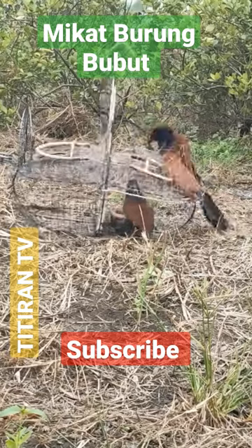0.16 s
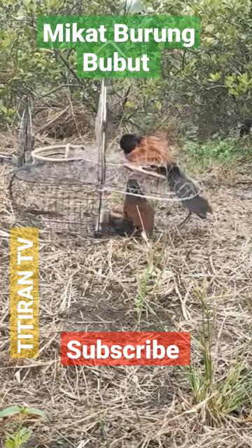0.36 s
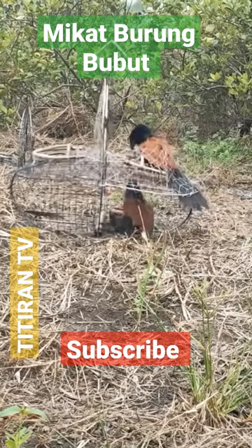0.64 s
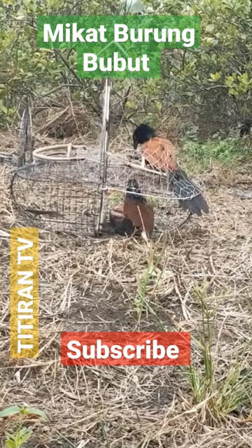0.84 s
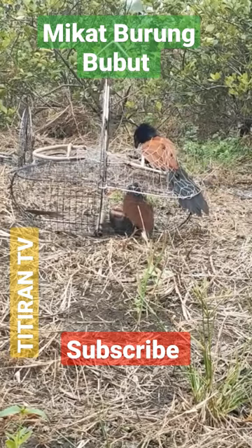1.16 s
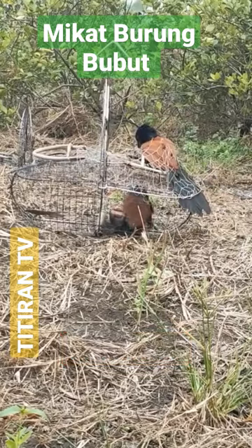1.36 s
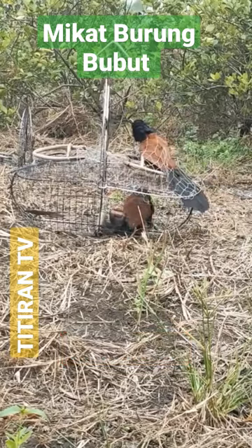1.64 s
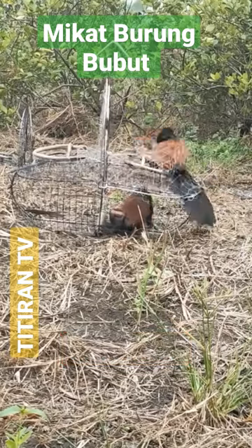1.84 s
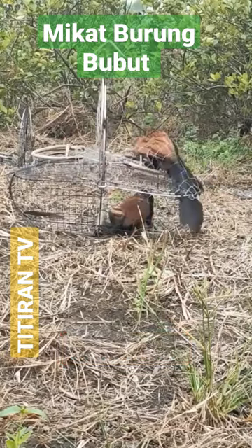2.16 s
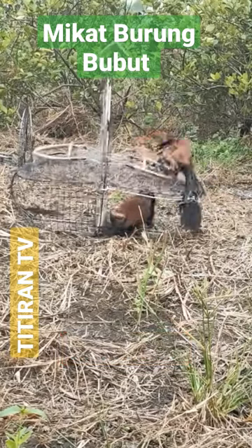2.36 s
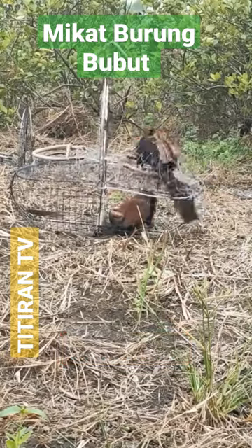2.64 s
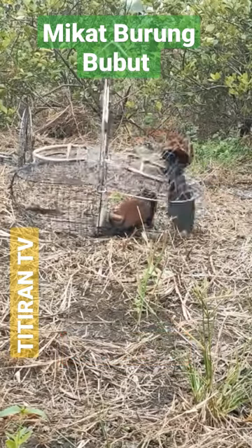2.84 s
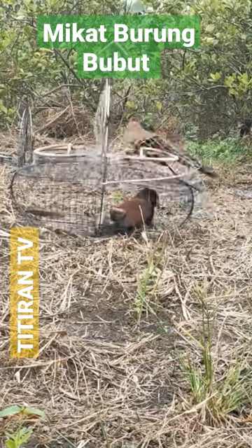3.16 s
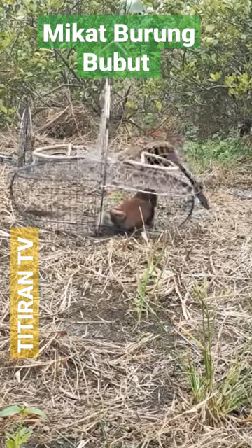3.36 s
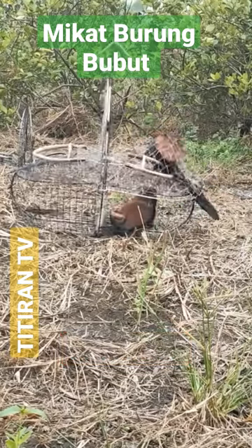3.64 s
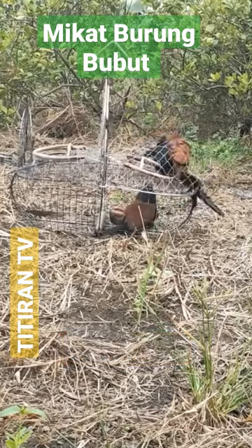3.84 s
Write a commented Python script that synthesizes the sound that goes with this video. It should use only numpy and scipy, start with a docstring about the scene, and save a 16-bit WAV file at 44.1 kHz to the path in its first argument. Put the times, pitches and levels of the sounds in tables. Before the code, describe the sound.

A coucal's low, nearly pure hoots start softly at 2.4 seconds, grow quickly and repeat about every 0.23 seconds to the end. Before them, claws and feathers scratch, thud and rattle on a wire cage until 0.55 and around 0.9-1.4, returning lightly after 3.3. High insect trills buzz in four bursts over faint shimmer, distant hoots, late thin whistles and quiet open air.

```python
"""Coucal and caged bird in a dry clearing

A coucal close by gives a run of low, nearly pure hoots, built from swept sines with raspy overtones.
A bird flaps and scrabbles on a wire cage: noise bursts, brushed feathers and faintly ringing wires.
Behind them insects buzz in two bands, far coucals hoot on a steady beat and a far bird whistles thinly.
Scatter from the surrounding scrub, two short echoes of the hoots and a quiet hush of air fill the place."""
import sys
import numpy as np
from scipy import signal
from scipy.fft import rfft, irfft
from scipy.io import wavfile
from scipy.ndimage import uniform_filter1d

SR = 44100
rng = np.random.default_rng(int(sys.argv[2]) if len(sys.argv) > 2 else 0)


def file_out(sig):
    """Save sig as 16-bit WAV at sys.argv[1]."""
    # one column per channel
    cols = np.atleast_2d(sig).T
    # limit, then scale
    lim = np.clip(cols, -1, 1)
    pcm = np.round(lim * 32767).astype(np.int16)
    wavfile.write(sys.argv[1], SR, pcm)


N = 176400
TOP_HZ = 15600  # upper edge of the recorder's treble


def undb(db):
    """Decibels to gain."""
    return 10 ** (np.asarray(db) / 20)


def unit(x):
    """Scale to an rms of 1."""
    return x / np.sqrt(np.mean(x ** 2) + 1e-20)


def fade(u):
    """Smooth step from 0 to 1."""
    return np.sin(np.pi / 2 * np.clip(u, 0, 1)) ** 2


def walk(rate):
    """Smooth random wander with an rms near 1, from `rate` random values a second smoothed twice."""
    k = max(int(SR / rate), 1)
    steps = np.repeat(rng.standard_normal(N // k + 1), k)
    smooth = uniform_filter1d(uniform_filter1d(steps, k), k)
    return unit(smooth[:N])


def stereo_noise(side_db):
    """White noise with a shared middle and a side part at side_db relative to it."""
    mid, side = rng.standard_normal((2, N))
    return mid + undb(side_db) * side * np.array([[1], [-1]])


def filtered(x, points):
    """Causal (minimum-phase) filter through (Hz, dB) points that keeps the power of white noise."""
    hz, db = np.array(points, float).T
    size = 2 * N
    f = np.maximum(np.arange(N + 1) * SR / size, 1)
    gain = unit(undb(np.interp(np.log(f), np.log(hz), db)))
    cepstrum = irfft(np.log(gain))
    # fold the cepstrum onto positive time, so nothing sounds ahead of its cause
    cepstrum[1:N] *= 2
    cepstrum[N + 1:] = 0
    response = np.exp(rfft(cepstrum))
    return irfft(rfft(x, size) * response)[..., :N]


def colour(x, points):
    """Filtered sound at an rms of 1."""
    return unit(filtered(x, points))


def scrub(x, side_db):
    """Diffuse scatter from bushes and ground: a decaying stereo noise tail of unit energy."""
    t60_s, onset_s = 0.32, 0.016
    t = np.arange(N) / SR
    tail = stereo_noise(side_db) * np.exp(-np.log(1000) * t / t60_s) * fade(t / onset_s)
    return signal.fftconvolve(x[None], unit(tail) / np.sqrt(N), axes=1)[:, :N]


def air():
    """Quiet outdoor hush, its low part shared by both ears, with a faint insect haze on top."""
    # colour of the hush: f/Hz, relative level/dB
    hush_colour = [(100, -36.5), (160, -1.5), (230, 11.5), (350, 4.5), (480, 1.5), (800, -12.5), (1400, -8),
                   (2200, -8), (5800, -11.5), (7400, 3), (8900, -11.5), (10000, 1.5), (11500, -10),
                   (15500, -18)]
    level_db = -62.5
    mid = colour(rng.standard_normal(N), hush_colour)
    high_pass = signal.butter(1, 900, "high", fs=SR, output="sos")
    side = signal.sosfilt(high_pass, colour(rng.standard_normal(N), hush_colour))
    hush = mid + undb(-0.5) * side * np.array([[1], [-1]])
    return undb(level_db + .5 * walk(1.1)) * hush


def far_insects(t):
    """Many far insects merge into one shimmering band of noise."""
    # slow course of the chorus: t/s, level/dB
    chorus_level = [(0, -58), (.45, -52.5), (.7, -55.5), (1.1, -53), (1.6, -56), (2.02, -58.5), (2.2, -52),
                    (2.5, -52), (3.0, -57.5), (3.5, -53), (4, -55.5)]
    # colour of the chorus: f/Hz, relative level/dB
    chorus_colour = [(3500, -44), (4200, -21.5), (4500, -7.5), (4730, 0.5), (5250, -14), (6000, -45)]
    times, levels_db = np.array(chorus_level).T
    db = np.interp(t, times, levels_db) + .5 * walk(45)
    return undb(db) * colour(stereo_noise(side_db=-5.5), chorus_colour)


def far_coucals(t):
    """Faint, slightly falling hoots from two birds taking turns on one steady beat."""
    # one line a bird, repeated on the beat throughout: t/s of one hoot, mid-hoot f/Hz, level/dB
    far_hoots = [(0.336, 350, -60.5), (0.537, 326, -67.5)]
    beat_s, length_s, sag_hz_per_s = .383, 0.15, 120
    out = np.zeros(N)
    for first, hz, db in far_hoots:
        age = (t - first) % beat_s
        pitch = hz - sag_hz_per_s * (age - length_s / 2)
        arch = np.sin(np.pi * np.minimum(age / length_s, 1))
        out += undb(db) * arch * np.sin(2 * np.pi * np.cumsum(pitch) / SR)
    return out


def far_bird(t):
    """Thin, slightly hoarse whistles: gliding sines with wandering pitch and level, blurred by distance."""
    # start t/s, length/s, first f/Hz, middle f/Hz, last f/Hz, level/dB
    whistles = [(2.168, 0.16, 1495, 1540, 1423, -62), (2.385, 0.33, 1461, 1469, 1492, -62.5),
                (2.769, 0.14, 1598, 1569, 1594, -58), (3.0, 0.08, 1655, 1765, 1850, -50.5),
                (3.068, 0.06, 1943, 1886, 1790, -56.5), (3.089, 0.4, 1315, 1320, 1270, -67),
                (3.207, 0.43, 1760, 1702, 1693, -56), (3.541, 0.27, 1683, 1652, 1728, -67),
                (3.822, 0.15, 1616, 1687, 1760, -53.5)]
    hoarse_db, wet_db = -9, -1
    out, waver = np.zeros(N), 1 + 0.02 * walk(260)
    for start, length, first, middle, last, db in whistles:
        u = (t - start) / length
        pitch = np.interp(u, [0, .5, 1], [first, middle, last]) * waver
        phase = 2 * np.pi * np.cumsum(pitch) / SR
        tone = np.sin(phase) * (1 + 0.29 * walk(90))
        hoarse = undb(hoarse_db) * walk(970) * np.cos(phase)
        out += undb(db) * fade(u * 6) * fade((1 - u) * 2) * (tone + hoarse)
    return out + undb(wet_db) * scrub(out, side_db=0.5)


def near_insect(t):
    """Each wing stroke clicks and rasps in a narrow resonance; a trill grows, slows a little, stops short."""
    # start t/s, end t/s, level/dB it grows towards, first pulse rate f/Hz, last pulse rate f/Hz
    trills = [(-.25, 0.507, -52.5, 177, 163.8), (0.954, 1.704, -52, 176.6, 160.3),
              (2.148, 2.936, -51.5, 180, 162.3), (3.405, 4.169, -49.5, 177.5, 162.1)]
    # the resonance: f/Hz, relative level/dB
    trill_colour = [(4500, -42.5), (5700, -21.5), (6100, -15.5), (6330, -1.5), (6560, -1.5), (6850, -15),
                    (8000, -22.5), (9000, -37), (15500, -41)]
    rise_s, rise_db, stop_s = 0.22, 21, .008
    rasp_share, rasp_db, jitter = 0.45, -4.5, .006  # rasp_share: part of each stroke that rasps
    level, clicks, rasp_gate = np.zeros((3, N))
    unsteady = 1 + jitter * walk(170)
    for start, end, db, first_hz, last_hz in trills:
        on = (t > start) & (t < end)
        rate = np.interp(t, [start, end], [first_hz, last_hz]) * unsteady
        phase = np.cumsum(rate) / SR % 1
        clicks += on * (np.diff(phase, prepend=0) < 0)
        rasp_gate += on * (phase < rasp_share)
        growth_db = db - rise_db * np.exp(-np.maximum(t - start, 0) / rise_s)
        level += on * undb(growth_db) * fade((end - t) / stop_s)
    uneven_clicks = unit(clicks * undb(1.3 * walk(150)))
    rasp = unit(stereo_noise(side_db=7.0) * rasp_gate)
    buzz = level * colour(uneven_clicks + undb(rasp_db) * rasp, trill_colour)
    return buzz + undb(-0.5) * scrub(buzz.mean(axis=0), side_db=-2.5)


def crackle():
    """Dense tiny snaps of straw and feather barbs, each with its own pitch, size and side."""
    snaps_per_s, decay_cycles, spread_db = 600, 9, 3.5
    out, age = np.zeros((2, N + 512)), np.arange(512) / SR
    for when, pitch, size, side in rng.random((int(snaps_per_s * N / SR), 4)):
        hz = min(np.interp(pitch, [0, 1], [1400, 14500]), TOP_HZ)
        # higher snaps are shorter and stronger
        snap = np.sin(2 * np.pi * hz * age) * np.exp(-age * hz / decay_cycles) * hz
        ears = np.array([[np.sin(side * np.pi / 2)], [np.cos(side * np.pi / 2)]])
        strength = undb(-spread_db * np.log(max(size, .04)))  # few large, many small
        i = int(when * N)
        out[:, i:i + len(age)] += ears * snap * strength
    return unit(out[:, :N])


def flutter(x):
    """Barbs catch and let go: every narrow band swells and sinks on its own."""
    rate_per_s, depth_db, top_band = 55, 3.2, 20
    spectrum = rfft(x)
    f = np.arange(N // 2 + 1) * SR / N
    place = np.sqrt(f / TOP_HZ) * top_band  # bands widen towards the treble
    out = 0
    for band in range(top_band + 1):
        part = irfft(spectrum * np.maximum(1 - abs(place - band), 0), N)
        out = out + part * undb(depth_db * walk(rate_per_s))
    return unit(out)


def strikes_on_cage(t):
    """Claws and wings hit the mesh: bright scratch, wire clatter, thud and a squeak at its own pitch."""
    # t/s, decay/s, then relative levels: scratch/dB, clatter/dB, thud/dB, and squeak f/Hz
    strikes = [(.004, 0.003, -41.5, -59, -26.5, 5630), (0.026, 0.0034, -43, -52, -65, 6100),
               (0.112, 0.0035, -47, -75, -43.5, 6800), (.171, .0039, -37.5, -66.5, -75, 7480),
               (.236, 0.0032, -39, -46, -44, 6650), (.249, 0.011, -34, -49.5, -43.5, 11300),
               (.352, 0.0026, -29.5, -59, -72, 6600), (0.393, 0.0062, -32, -63, -50, 12300),
               (0.442, .0045, -40, -52, -45, 5600), (0.536, 0.0022, -45.5, -69, -74, 7800),
               (.917, 0.0014, -56, -51, -40.5, 5030), (0.999, 0.0025, -40.5, -50, -59, 4800),
               (1.052, 0.0017, -30.5, -36, -35, 5060), (1.06, 0.0023, -41, -63, -62.5, 13200),
               (1.075, 0.0028, -42, -59.5, -63, 7600), (1.089, 0.0016, -47, -57, -49.5, 11400),
               (1.139, 0.0031, -38, -68, -53.5, 11400), (1.252, 0.0064, -47, -54.5, -50.5, 6960),
               (1.303, 0.0058, -40, -39, -43, 6050), (1.346, .004, -36.5, -56, -72, 11700),
               (1.355, 0.0028, -47, -40.5, -62, 6560), (1.359, 0.0083, -33.5, -54, -68.5, 11300),
               (1.378, 0.007, -39, -65, -75, 6900), (3.333, 0.0061, -40.5, -57.5, -64.5, 7860),
               (3.345, 0.0026, -34, -59, -54, 6110), (3.439, 0.0025, -38, -55, -64, 5810),
               (3.619, 0.0033, -34, -70, -56, 5760), (3.774, 0.0015, -47, -70, -49, 6070),
               (3.784, .003, -47, -63, -69.5, 5600), (3.83, .001, -38.5, -60, -68, 7440),
               (3.95, .0029, -33, -38, -66, 5600)]
    # colour of the bright scratch: f/Hz, relative level/dB
    scratch_colour = [(1500, -30), (3500, -23), (5000, -3), (6200, 1.5), (7600, -2.5), (9000, -7),
                      (11300, 0), (13000, -10.5), (15500, -5.5)]
    # colour of the wire clatter: f/Hz, relative level/dB
    clatter_colour = [(400, -23.5), (900, -18), (1350, -6), (2400, 1), (2850, -10.5), (8000, -23.5)]
    # colour of the thud: f/Hz, relative level/dB
    thud_colour = [(140, -33), (230, -2), (350, 6), (580, 2.5), (850, -12.5), (1200, -14.5), (2000, -27)]
    rise_s, shiver_s, shiver_db = .0018, 0.019, -9.5  # the shiver is a weaker, slower decay
    squeak_db, squeak_width_hz = -2.5, 700  # squeak level relative to the scratch
    force, squeaks = np.zeros((3, N)), np.zeros(N)
    for start, decay, bright, clatter, thud, hz in strikes:
        age = np.maximum(t - start, 0)
        shiver = undb(shiver_db) * np.exp(-age / shiver_s)
        shape = fade(age / rise_s) * (np.exp(-age / decay) + shiver)
        force += undb([bright, clatter, thud])[:, None] * shape
        squeaks += undb(bright + squeak_db) * shape * np.sin(2 * np.pi * hz * age)
    # a separate wander in each ear widens the squeaks into narrow bands
    squeaks = squeaks * np.array([walk(2 * squeak_width_hz), walk(2 * squeak_width_hz)])
    scratch = filtered(force[0] * flutter(stereo_noise(side_db=-1)), scratch_colour)
    clatter = filtered(force[1] * unit(stereo_noise(side_db=-13.5)), clatter_colour)
    thud = filtered(force[2] * rng.standard_normal(N), thud_colour)
    return scratch + squeaks + clatter + thud


def brushing_feathers(t):
    """Feathers brush wire and dry straw: fluttering swish and fine crackle under bell-shaped swells."""
    # middle t/s, half length/s, relative level/dB
    brushes = [(0, 0.074, -41), (0.26, 0.073, -46), (0.413, 0.059, -45), (.68, 0.29, -59.5),
               (1.047, .12, -48.5), (1.335, 0.13, -46), (2.854, .24, -55.5), (3.157, 0.054, -48.5),
               (3.374, 0.099, -57), (3.632, .024, -49.5), (3.752, 0.3, -56), (3.99, 0.071, -44)]
    # colour of the swish: f/Hz, relative level/dB
    feather_colour = [(110, -44.5), (210, -0.5), (380, 6.5), (900, -10), (2100, 1), (3100, -6.5),
                      (5500, 5.5), (7600, 3.5), (9200, -6.5), (11300, 1.5), (15500, -12.5)]
    brushing = sum(undb(db) * np.exp(-((t - middle) / half) ** 2) for middle, half, db in brushes)
    rough_noise = stereo_noise(side_db=-6.0) * undb(2 * walk(1500))
    swish = flutter(colour(rough_noise, feather_colour))
    return brushing * (undb(-2) * swish + undb(-8) * crackle())


def wire_scrapes(t):
    """Thin scrapes along single wires: tones unsteady in pitch and level."""
    # middle t/s, half length/s, f/Hz, level/dB
    scrapes = [(0.116, 0.043, 2080, -57.5), (0.997, 0.029, 1287, -61.5), (1.01, 0.037, 3220, -51.5),
               (1.397, 0.076, 11100, -53), (3.841, 0.02, 4100, -54.5)]
    width = .03  # spread of the pitch, as a share of it
    out = np.zeros(N)
    for middle, half, hz, db in scrapes:
        swell = undb(db) * np.exp(-((t - middle) / half) ** 2)
        pitch = hz * (1 + width * walk(700))
        out += swell * walk(2 * width * hz) * np.sin(2 * np.pi * np.cumsum(pitch) / SR)
    return out


def cage(t):
    """Strikes, brushing feathers and scrapes excite the mesh, whose wires ring faintly."""
    # ringing wires: f/Hz, relative level/dB, t60/s
    wire_modes = [(2071, -6, .4), (2180, -3, .45), (5245, -4, .3), (5835, -5, .3), (7655, -5, .25),
                  (8910, 2, .35), (11180, -3, .2), (11766, -3, .25), (12888, -3, .25)]
    wire_db, wet_db = -25.5, -14
    direct = strikes_on_cage(t) + brushing_feathers(t) + wire_scrapes(t)
    ring = np.zeros(N)
    for hz, db, t60 in wire_modes:
        ring += undb(db) * np.sin(2 * np.pi * hz * t) * np.exp(-np.log(1000) * t / t60)
    wires = signal.fftconvolve(direct, unit(ring)[None] / np.sqrt(N), axes=1)[:, :N]
    return direct + undb(wire_db) * wires + undb(wet_db) * scrub(direct.mean(axis=0), side_db=-13.0)


def coucal(t):
    """Hoots scoop up, swell to a crest and drop as they stop; octave and rasp hold level through the arch."""
    # start t/s, length/s, central f/Hz, level/dB, octave overtone level/dB relative to the hoot
    hoots = [(2.393, 0.071, 271.1, -18, -26), (2.552, 0.085, 296, -11, -29),
             (2.743, 0.11, 310.3, -7.5, -33), (2.966, 0.11, 313.4, -6.5, -35),
             (3.198, 0.11, 310.2, -7, -35.5), (3.43, 0.11, 303.8, -7.5, -35.5),
             (3.664, 0.11, 297.8, -8.5, -34.5), (3.894, 0.11, 301, -8.5, -34.5)]
    # echoes from the scrub: delay t/s, level/dB relative to the hoot
    echo_taps = [(.021, -19), (.062, -27)]
    attack_s, release_s, voice_stop_s = .018, .03, .012
    swell_db_per_s, crest_s = 68, .037  # the swell stops growing crest_s ahead of the end
    scoop_hz, scoop_s, rise_hz_per_s = 34, .01, 280
    drop_hz, drop_s, sac_share = 120, .008, .35
    third_db, rasp_db, puff_db, puff_s = -58.5, -45.5, -60, 0.072  # levels relative to the hoot
    wet_db = -20.5
    out = np.zeros(N)
    waver = 1 + .007 * walk(120)
    rasp_colour = [(200, -14), (450, -2), (650, -13.5), (900, -24.5), (2000, -40.0)]
    rasp = colour(rng.standard_normal(N), rasp_colour)
    puff = colour(rng.standard_normal(N), [(150, -1.5), (400, -27.5)])
    for start, length, hz, db, octave_db in hoots:
        age = np.clip(t - start, 0, length)
        onset = fade(age / attack_s)
        gate = (1 - np.exp(-age / attack_s)) * onset * fade((length - age) / release_s)
        voiced = onset * fade((length - age) / voice_stop_s)
        pitch = hz + rise_hz_per_s * (age - length / 2) - scoop_hz * np.exp(-age / scoop_s)
        steady = 2 * np.pi * np.cumsum(pitch * waver * (age > 0)) / SR
        drop = 2 * np.pi * drop_hz * drop_s * np.exp((age - length) / drop_s)
        phase = steady - drop
        sac_phase = steady - sac_share * drop  # the ringing throat follows only part of the drop
        swell = undb(swell_db_per_s * np.minimum(age - length + crest_s, 0))
        octave = undb(octave_db) * np.sin(2 * phase)
        third = undb(third_db) * swell * np.sin(3 * phase)
        breath = undb(rasp_db) * rasp + undb(puff_db) * puff * np.exp(-age / puff_s)
        out += undb(db) * (gate * swell * np.sin(sac_phase) + voiced * (octave + third + breath))
    echoes = sum(undb(db) * np.interp(t - delay, t, out) for delay, db in echo_taps)
    return out + echoes + undb(wet_db) * scrub(out, side_db=-6)


def scene():
    """Birds, cage and insects in the clearing."""
    t = np.arange(N) / SR
    background = air() + far_insects(t) + far_coucals(t) + far_bird(t)
    return background + near_insect(t) + cage(t) + coucal(t)


def record(dry):
    """The recorder cuts the top of the treble with a steep low-pass."""
    return signal.sosfilt(signal.ellip(10, .2, 80, TOP_HZ, fs=SR, output="sos"), dry)


dry = scene()
out = record(dry)
file_out(out)
```